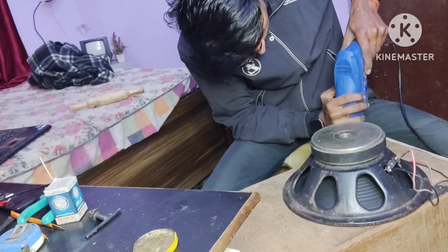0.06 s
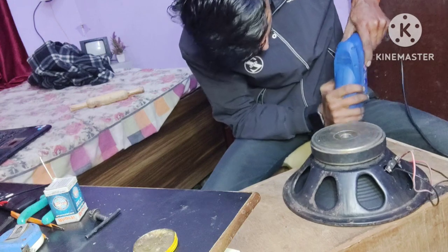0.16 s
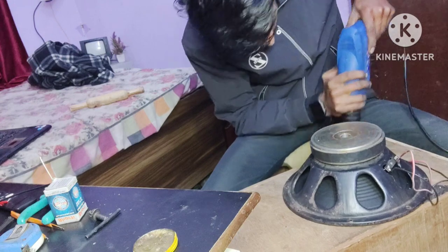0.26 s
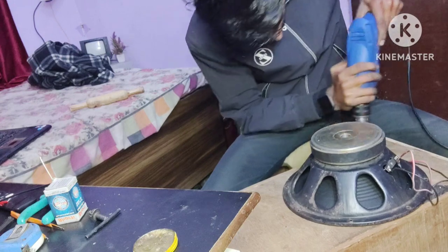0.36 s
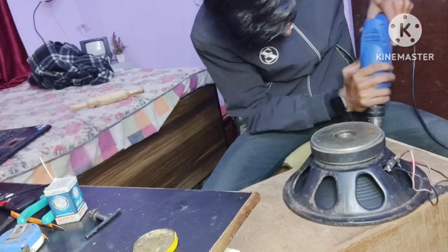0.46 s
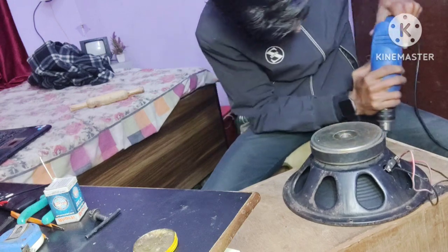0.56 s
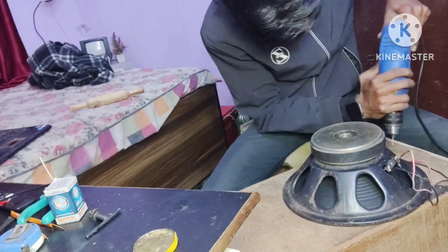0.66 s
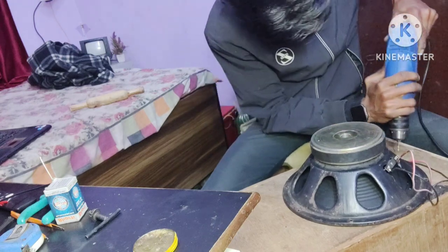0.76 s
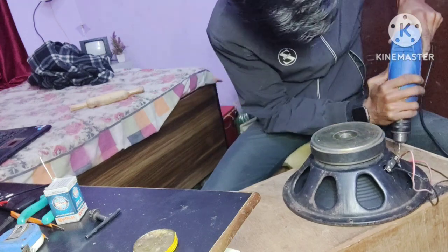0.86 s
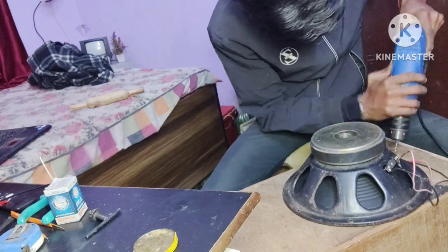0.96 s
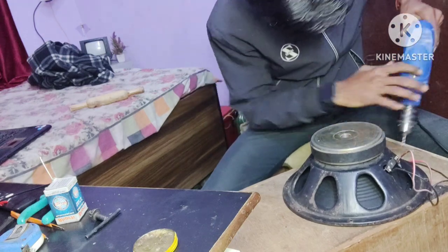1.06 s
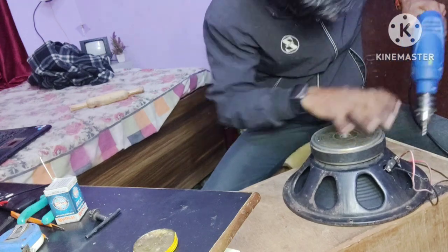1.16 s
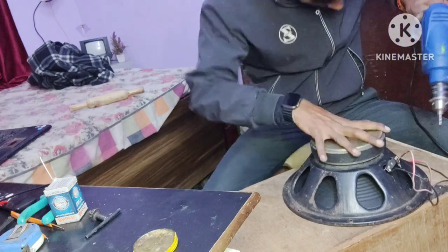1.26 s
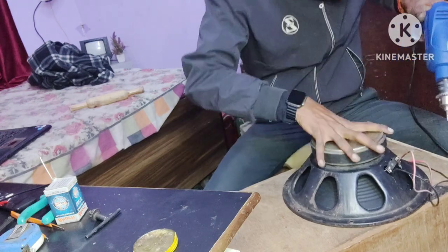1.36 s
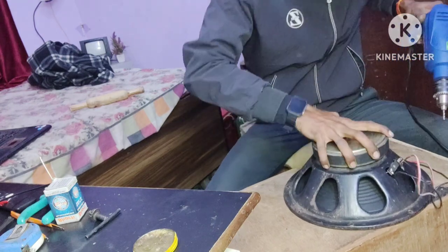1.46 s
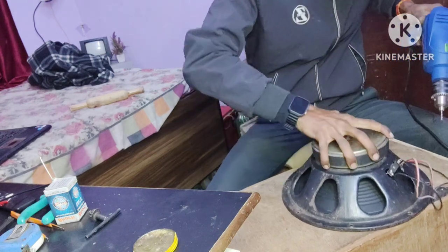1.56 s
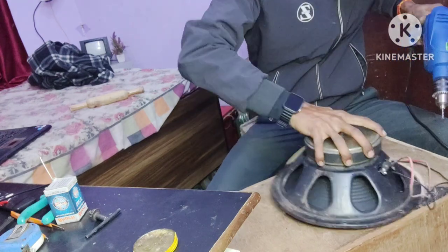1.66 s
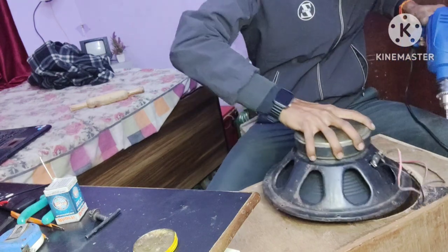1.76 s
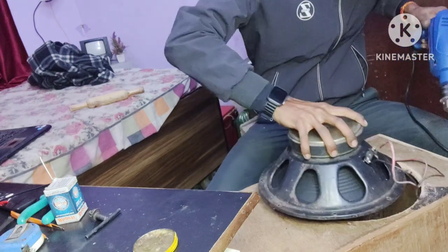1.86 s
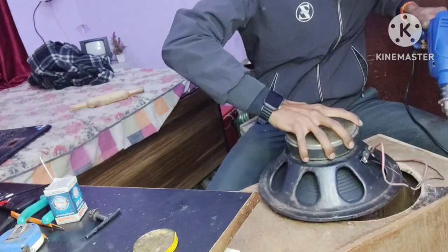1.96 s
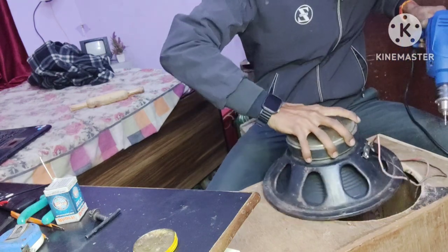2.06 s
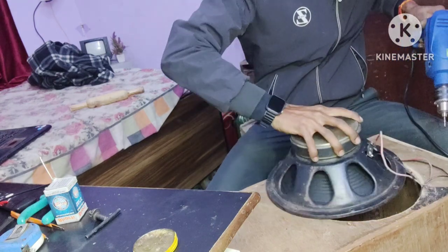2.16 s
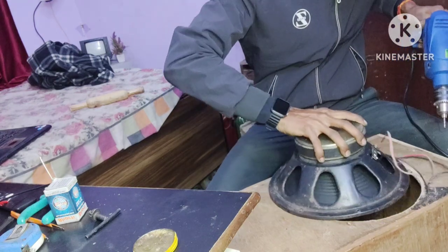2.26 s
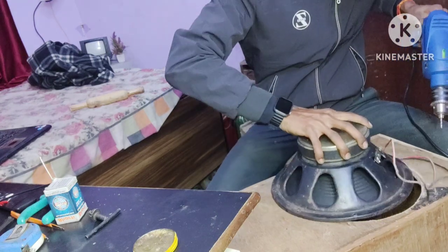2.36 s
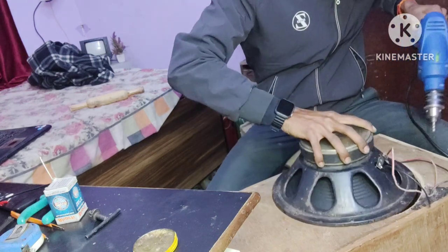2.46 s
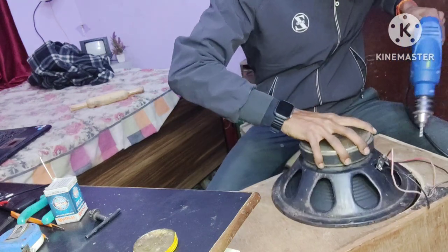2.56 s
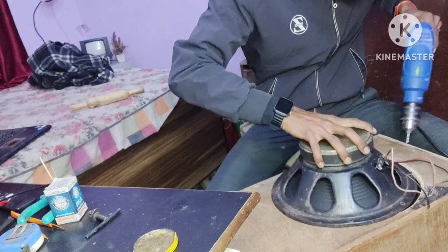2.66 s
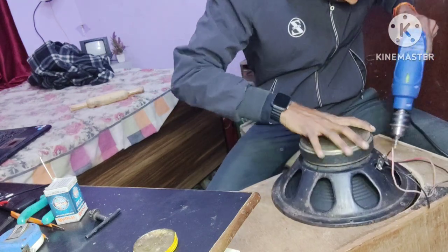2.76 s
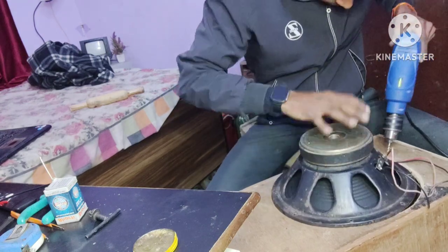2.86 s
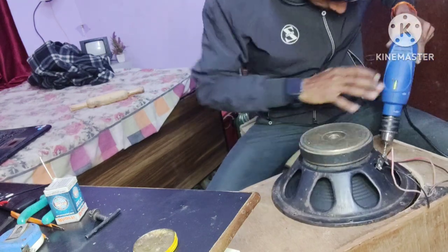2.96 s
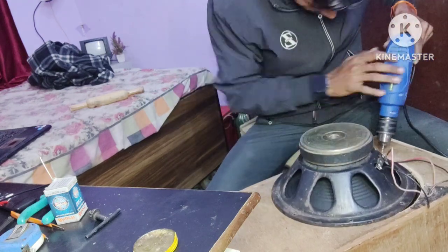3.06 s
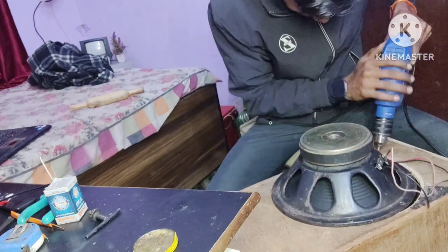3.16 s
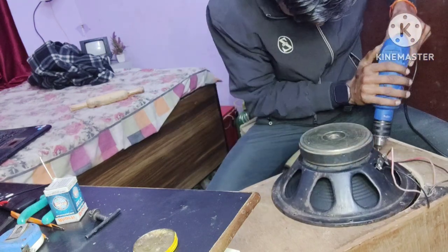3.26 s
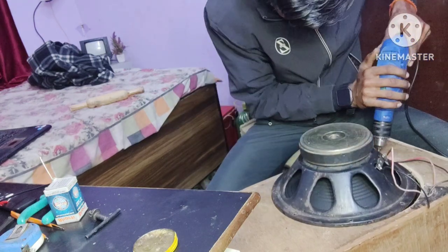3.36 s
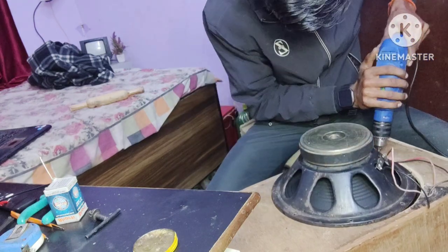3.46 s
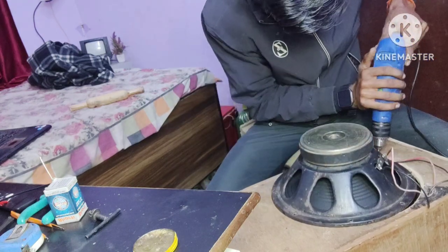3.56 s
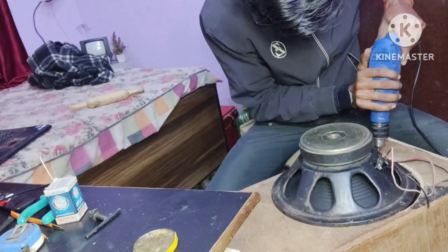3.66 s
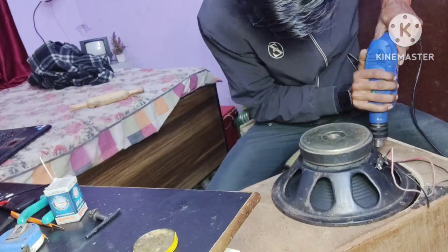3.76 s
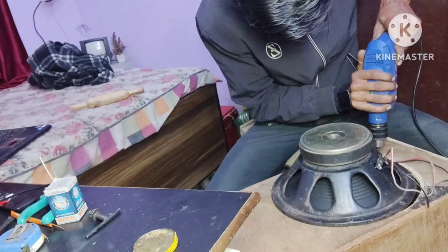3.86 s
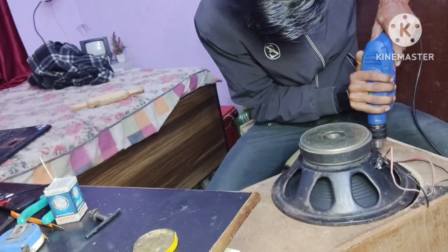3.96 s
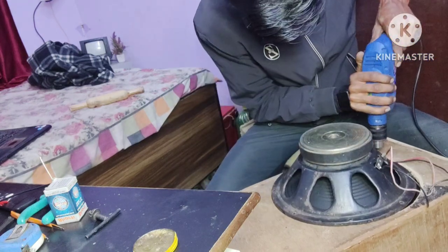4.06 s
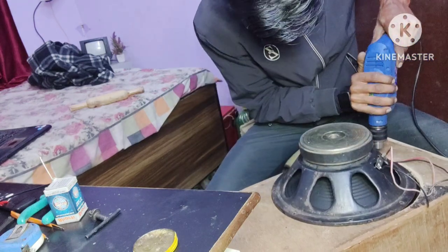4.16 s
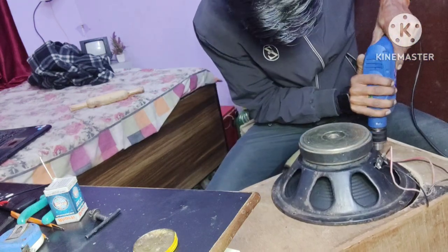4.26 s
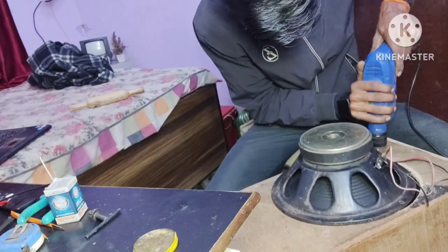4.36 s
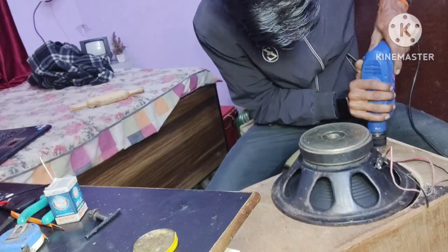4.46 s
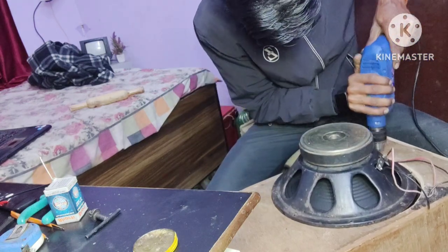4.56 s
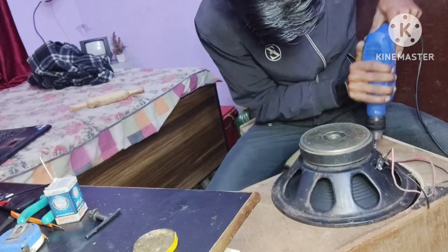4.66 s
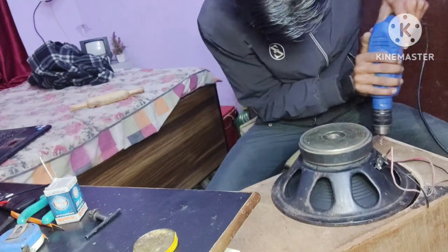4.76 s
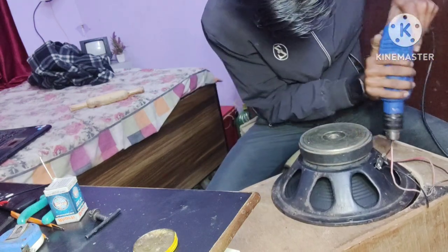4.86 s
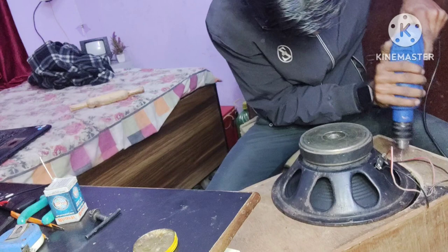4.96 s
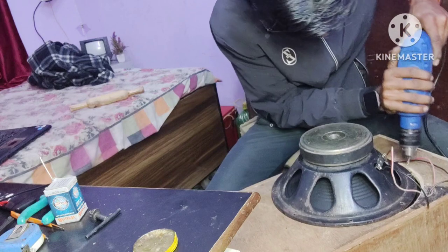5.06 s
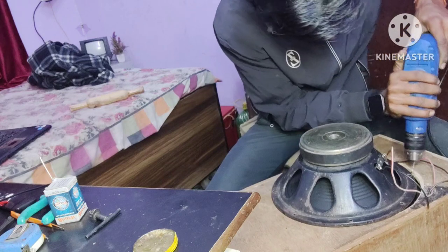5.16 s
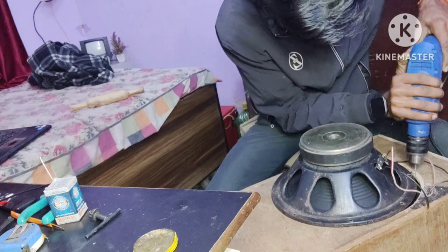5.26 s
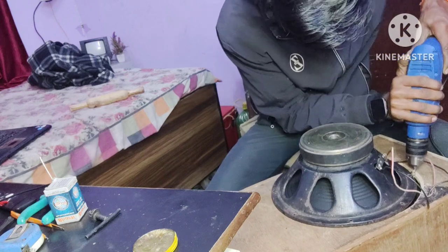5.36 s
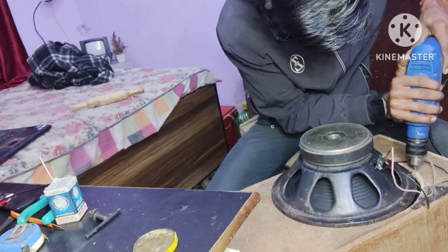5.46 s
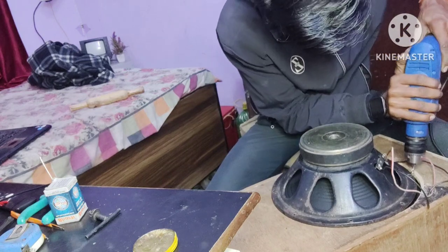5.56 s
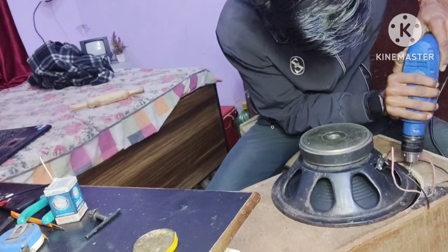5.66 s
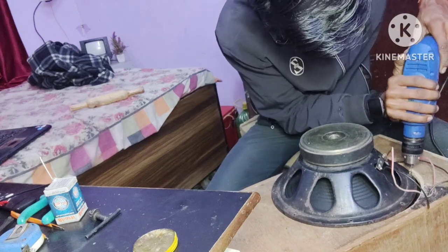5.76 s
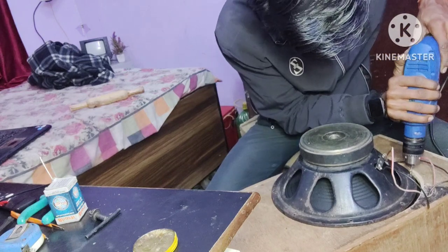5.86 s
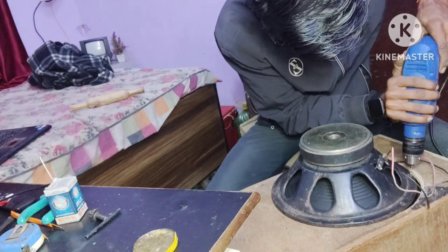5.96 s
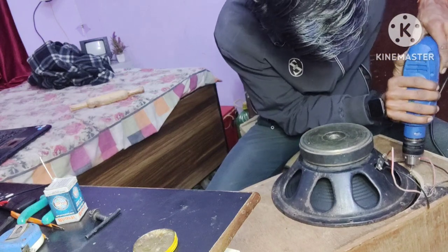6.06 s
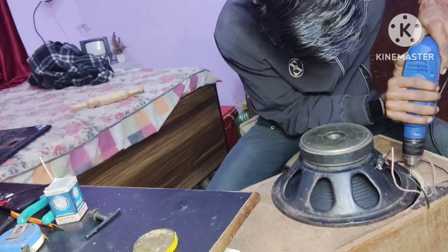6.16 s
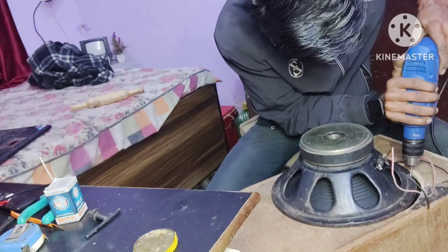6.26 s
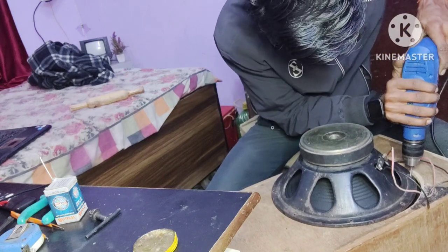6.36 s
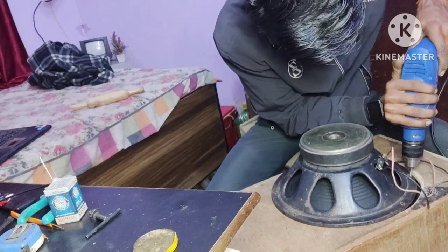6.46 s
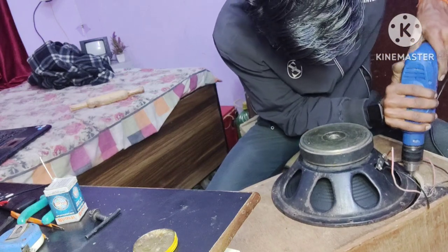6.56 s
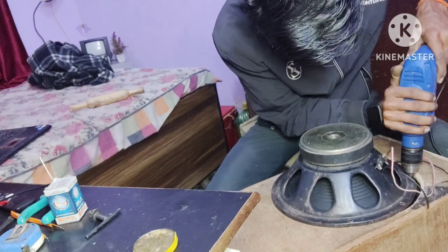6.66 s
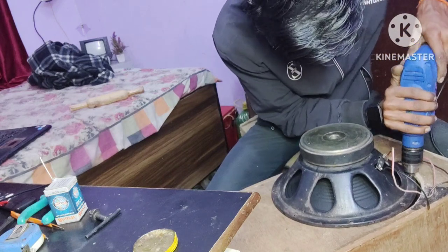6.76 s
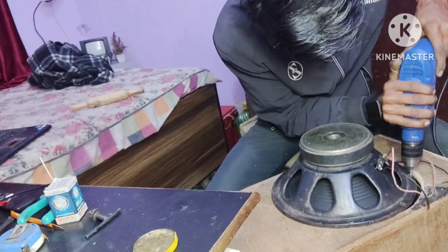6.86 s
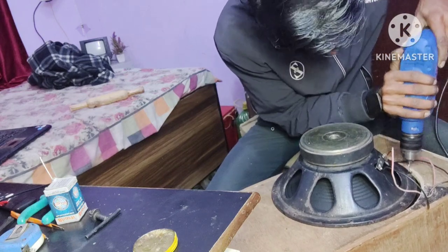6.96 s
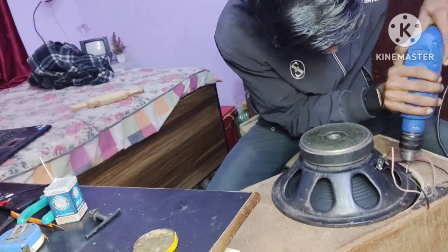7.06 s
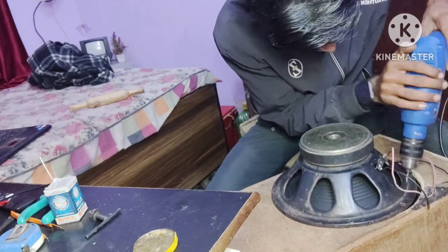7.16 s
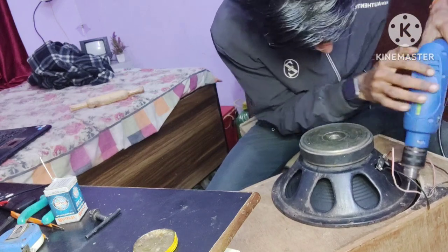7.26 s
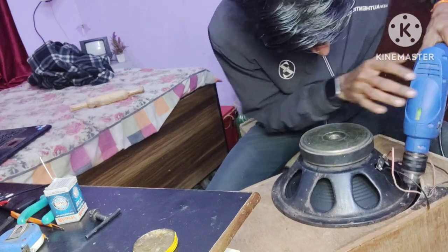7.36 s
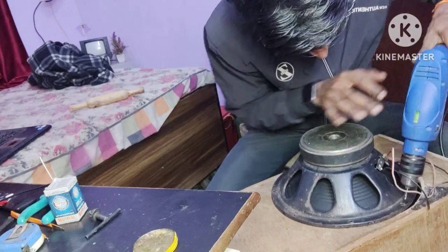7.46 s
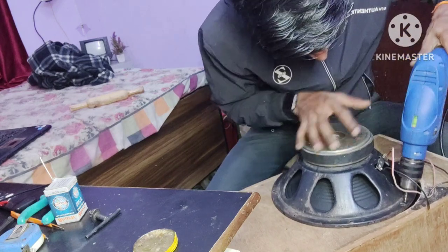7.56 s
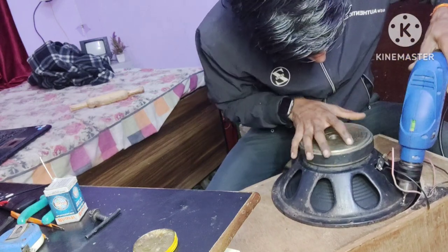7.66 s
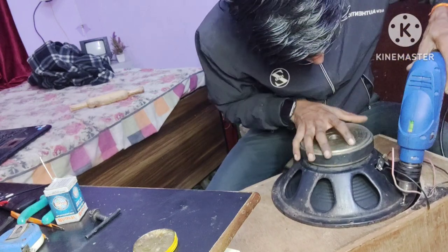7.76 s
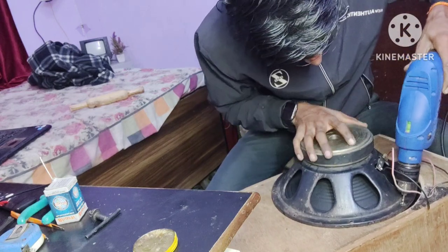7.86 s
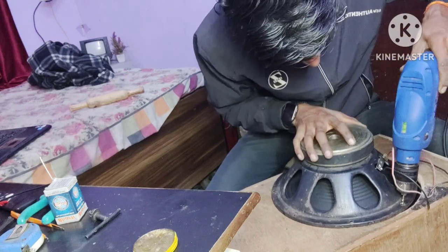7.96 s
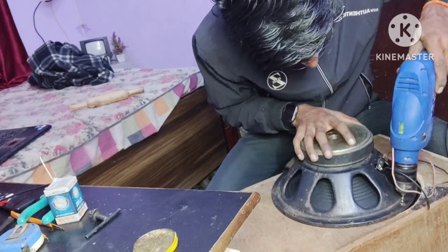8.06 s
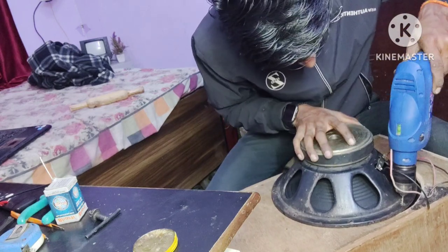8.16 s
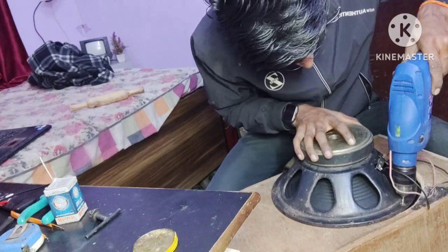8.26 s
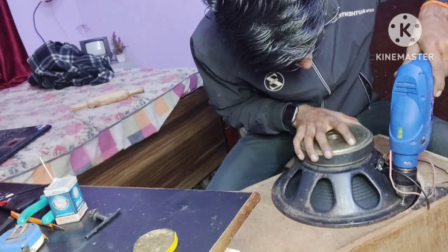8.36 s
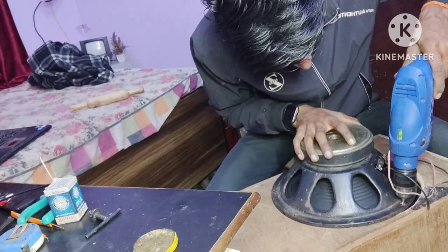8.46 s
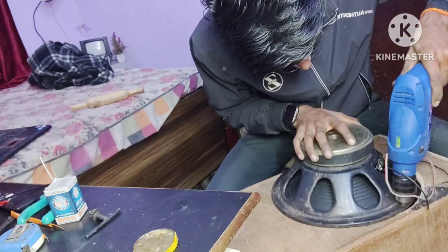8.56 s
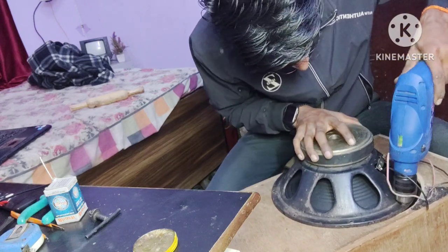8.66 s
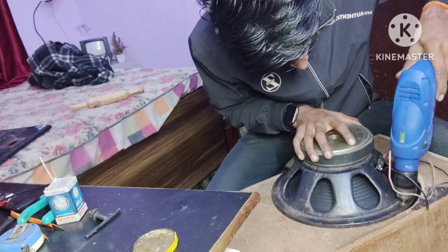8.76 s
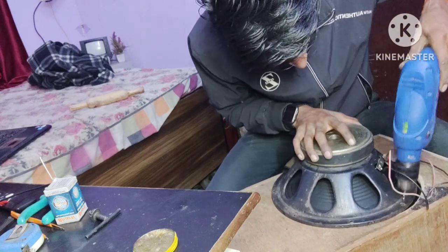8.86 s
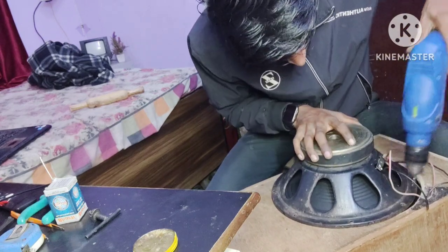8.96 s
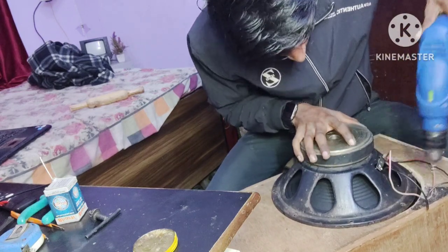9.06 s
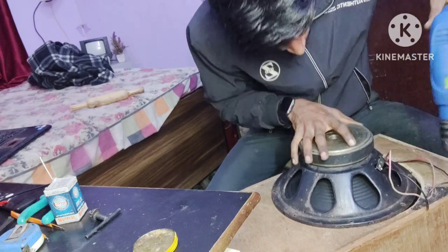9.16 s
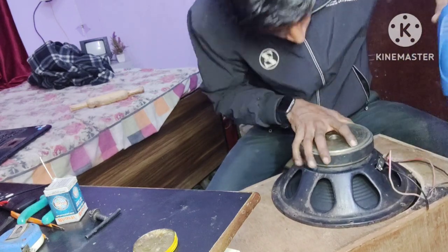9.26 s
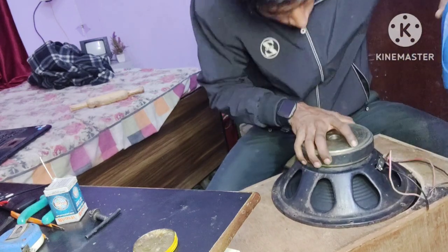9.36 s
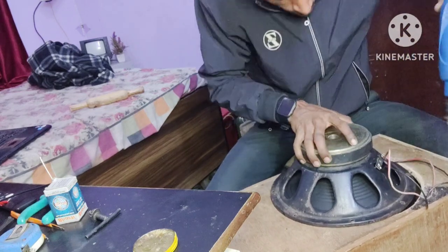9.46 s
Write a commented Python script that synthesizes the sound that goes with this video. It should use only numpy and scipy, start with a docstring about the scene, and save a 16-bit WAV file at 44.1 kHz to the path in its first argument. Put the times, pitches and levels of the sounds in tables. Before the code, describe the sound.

Close stereo sound in a small room with short wall reflections. At 0 s a handheld electric drill is already at full speed, its bit knocking and a screw rattling in a wooden cabinet; power stops almost at once and the gritty gear whine glides down for about a second, fading near 1.2 s. From 1.3 to 2.7 s the loudspeaker is shifted: soft hollow bumps, scuffs and tiny metal ticks, densest around 2.4 s. A quiet fan whine and soft air noise remain. At 4.0 s the drill spins up quickly, buzzing and hissing, the screw grinding until hard knocks and a rattle at 4.5 s, then coasts down to about 5.7 s. Faint bumps near 5.5 and 5.9 s. A third pull runs from 6.25 s, slipping at 6.75 s, dying by 7.9 s with light taps at 7.8 s. The fourth starts at 8.2 s, clatters at 8.7 s, and is still winding down at the end.

```python
"""A power drill backs screws out of a loudspeaker frame on a wooden cabinet, in a small room.
Four short trigger pulls, the first already under way and the last still coasting at the end: noise and
tones follow the rotor's turns, while screw and bit strike a bank of decaying cabinet modes.
In between, the shifted loudspeaker bumps the cabinet and metal ticks as bursts of grit.
Behind it a small fan whines in soft air noise; near walls answer, and two close microphones hear it all."""
import sys
import numpy as np
from scipy import signal
from scipy.fft import rfft, irfft, next_fast_len
from scipy.io import wavfile

SR = 44100
rng = np.random.default_rng(int(sys.argv[2]) if len(sys.argv) > 2 else 0)


def dump_mix(stems):
    """Bounce the given channels to the path in sys.argv[1] as a 16-bit WAV at rate SR."""
    frames = np.atleast_2d(stems).T  # one column per channel
    limited = np.clip(frames, -1, 1)  # hard clip at full scale
    pcm = np.round(limited * 32767).astype(np.int16)
    wavfile.write(sys.argv[1], SR, pcm)


N = 419832
TIME = np.arange(N) / SR
EDGE_HZ = 15550  # upper band limit

# The trigger pulls. Each row: pressed at in seconds, released at in seconds, free speed in turns/s,
# spin-up time in seconds, coasting time in seconds.
PULLS = [(-.532, .069, 335, .191, 1.145), (3.972, 4.591, 327.8, .158, 1.202),
         (6.254, 6.827, 322.9, .185, 1.232), (8.21, 8.79, 338.5, .175, 1.275)]
# The gears sit differently on each pull, and touch on their other flanks when coasting.
# Each row: grinding in dB, then three mesh tones under power in dB, and the same tones coasting in dB;
# the tones lie at 5, 10 and 15 times rotor speed.
MESH_DB = [(1.5, (-2, -1, -5), (-2, -5, 1.5)), (0, (-5, .5, -6), (-4, -3, -2)), (0, (-7, 0, -7),
           (-5, 0, -1)), (.5, (2.5, -3, -7), (2, -2, -5))]
# Weak gear overtones. Each row: multiple of rotor speed, level in dB.
GEAR_ORDERS = [(20, -6.5), (25, -8), (30, -7), (34, -9), (40, -9)]
# Commutator bars. Each row: multiple of rotor speed, level in dB.
BAR_ORDERS = [(24, -9.5), (48, -8.5), (72, -12.5), (96, -16)]
# Noise spectra of gears, brushes and cooling fan. Each row: frequency in Hz, level in dB.
GEARBOX = [(150, -22), (500, -12), (850, -6), (1080, -7), (1300, -1), (1550, 1), (1800, -2), (2150, 1),
           (2480, -5.5), (2850, 1.5), (3250, -1.5), (3700, -2.5), (4300, -7), (5200, -17), (9000, -35)]
BRUSHES = [(1500, -15.5), (3500, -1.5), (4500, 1.5), (5500, -1.5), (7500, -3), (8800, 1), (9700, -15.5),
           (11500, -3.5), (15500, -6)]
COOLING_AIR = [(30, -33), (100, -2.5), (300, -13.5), (700, 5.5), (1300, -2.5), (3000, -8.5), (8000, -6),
               (15000, -54)]
# The gear case picks out mesh tones gliding through its resonances. Each row: frequency in Hz, level in dB.
GEAR_CASE = [(400, -24), (700, -13), (1120, -17), (1280, -4), (1420, 0), (1600, -4.5), (1800, -8),
             (1990, 1), (2170, 2), (2430, -14), (2750, 2.5), (2980, 2), (3200, -3.5), (3700, -1),
             (4200, -1.5), (4700, -7), (5400, -14), (9000, -35)]
# The vents pass the commutator whistle best in the upper middle. Each row: frequency in Hz, level in dB.
VENTS = [(700, -14), (1150, -9), (1450, 2), (1750, 1), (2100, 6.5), (2430, -3), (2800, 2.5), (3300, 0),
         (3850, 4.5), (4600, -4), (5500, 1), (6600, 2), (7600, -2), (8500, -2), (10000, -11), (11600, 2),
         (13000, -7), (15000, -12)]
# Noise grows with speed as gentle rubbing plus a steep rush. Columns: rubbing at working speed in
# relative dB, its power of speed, rush at working speed in relative dB, its power of speed.
GRIND_LAW = (-28, 1.14, -25, 2.5)
HISS_LAW = (-34, 0.59, -26, 4)
FULL_SPEED = 320  # working speed (turns/s)
DRIVEN_DB = 1.5  # the gears grind harder while the motor pushes them
STRAIN_DB = 2.5  # from standstill the motor draws a heavy current and is louder for its speed
PULSE_HZ = 100


def drill(pull, grind_db, powered_db, coasting_db, air_db=-30, grain_db=3, throb=0.17, buzz=0.41):
    """Gear teeth and commutator bars scrape and sing; the fan roars. Gives (s, scraping, singing)."""
    t, speed = rotor(*pull)
    n = len(t)
    driven = t < pull[1]
    pace = speed / FULL_SPEED
    turns = np.cumsum(speed * (1 + .005 * wander(n, 250))) / SR

    push_db = driven * (DRIVEN_DB + STRAIN_DB * (1 - pace))
    gears = loudness(pace, *GRIND_LAW) * amp(grind_db + push_db - 1)
    # under power the brush hiss pulses a hundred times a second
    pulsing = 1 + buzz * driven * np.cos(2 * np.pi * PULSE_HZ * t)
    brushes = loudness(pace, *HISS_LAW) * pulsing

    # play in the bearings bunches the scraping into each turn
    bunching = (1 + throb * np.cos(2 * np.pi * turns)) * amp(1.5 * wander(n, 69.63))
    # chance rubbing, plus a worn part that gains power with speed
    rubbing = np.sqrt(.7) * rng.standard_normal(n) + np.sqrt(.15 * pace) * worn(turns)
    meshing = 1 + .5 * np.cos(2 * np.pi * 5 * turns)
    teeth = rubbing * amp(grain_db * wander(n, 1500)) * bunching * meshing
    bars = rng.standard_normal(n) * amp(2.0 * wander(n, 2500)) * bunching
    air = unit(colour(rng.standard_normal(n), COOLING_AIR)) * amp(air_db) * pace ** 1.61
    scraping = gears * unit(colour(teeth, GEARBOX)) + brushes * unit(colour(bars, BRUSHES)) + air

    mesh_orders = [(order, np.where(driven, on, off))
                   for order, on, off in zip((5, 10, 15), powered_db, coasting_db)]
    mesh = .62 * colour(tones([*mesh_orders, *GEAR_ORDERS], turns, speed), GEAR_CASE)
    commutator = 1.25 * colour(tones(BAR_ORDERS, turns, speed), VENTS)
    # the tones stand out more at low speed, where the rush is weak
    slow_lift = amp(np.where(driven, 2, 4.5) * (1 - pace))
    singing = (gears * mesh + brushes * commutator) * slow_lift
    return t[0], scraping, singing


FRICTION_SPEED = 190  # speed at which drag equals the dry friction of the brushes (turns/s)


def rotor(pressed, released, free_speed, spin_up, coast):
    """Power drives the rotor toward free speed; drag and friction stop it. Gives (clock s, turns/s)."""
    top = free_speed * (1 - np.exp((pressed - released) / spin_up))
    stopped = released + coast * np.log(1 + top / FRICTION_SPEED)
    t = np.arange(pressed, stopped, 1 / SR)
    rising = free_speed * (1 - np.exp((pressed - t) / spin_up))
    coasting = (top + FRICTION_SPEED) * np.exp((released - t) / coast) - FRICTION_SPEED
    return t, np.maximum(np.where(t < released, rising, coasting), 0)


CRAWL_SPEED = 20  # below this the rotor is almost silent (turns/s)


def loudness(pace, rub_db, rub_power, rush_db, rush_power):
    """Rubbing rules at low speed, the rush near full speed."""
    turning = np.tanh(pace * FULL_SPEED / CRAWL_SPEED)
    return turning * np.hypot(amp(rub_db) * pace ** rub_power, amp(rush_db) * pace ** rush_power)


def worn(turns, count=44, size=2048):
    """Uneven teeth scrape alike on every turn: weak partials glide with the rotor, in slowly varying mix."""
    phases = np.exp(2j * np.pi * rng.random((3, count)))
    marks = irfft(np.c_[np.zeros((3, 1)), phases], size)
    place = turns % 1 * size
    return unit(sum(wander(len(turns), 15) * np.interp(place, np.arange(size), row) for row in marks))


def tones(orders, turns, speed):
    """Partials locked to the rotor; each swells, fades and flutters on its own."""
    n = len(turns)
    total = np.zeros(n)
    for order, db in orders:
        level = amp(db - 1.3 + 1.8 * wander(n, 30) + 3.2 * wander(n, 160))
        wave = np.cos(2 * np.pi * (order * turns + rng.random()))
        total += level * wave * (order * speed < EDGE_HZ)
    return total


# The screw rattles free once on each pull. Each row: start in seconds, length in seconds, relative
# level in dB, hardness in Hz, fade over the length in dB, rumble of the thread before in relative dB,
# loose screw after in relative dB.
SLIPS = [(0, 0.12, -16.5, 1400, 4.5, -32, -31.5), (4.489, 0.073, -15.5, 900, 1.5, -30.5, -29.5),
         (6.747, .06, -20, 1530, 9, -30.5, -25.5), (8.686, 0.12, -16.5, 500, 2, -36, -30.5)]
LOOSE_S, LOOSE_HZ, LOOSE_FADE_DB = 0.31, 288, 24  # the freed screw chatters and settles


def screw(pressed, s, length, db, hard_hz, fade_db, thread_db, loose_db):
    """The thread rumbles in the board, the screw rattles free, then chatters and settles."""
    return [thread(pressed, s, thread_db),
            rattle(s, length, db, hard_hz, fade_db),
            rattle(s + length, LOOSE_S, loose_db, LOOSE_HZ, LOOSE_FADE_DB)]


# The board around the turning screw. Each row: frequency in Hz, level in dB.
THREAD_COLOUR = [(30, -7), (90, -8.5), (150, 1), (230, -6), (300, -1.5), (480, -10.5), (1500, -34.5)]
THREAD_SWELL_DB = 13.5  # the bite grows steadily by this much until the screw slips
THREAD_RISE_S = 0.13  # the thread starts to turn gently


def thread(start, end, db, lumpy_db=3):
    """The thread grinds through the board in uneven bites, ever harder."""
    n = round((end - start) * SR)
    swell = amp(THREAD_SWELL_DB * np.linspace(-1, 0, n) + lumpy_db * wander(n, 40.5))
    swell *= np.minimum(np.arange(n) / SR / THREAD_RISE_S, 1)
    return start, amp(db) * unit(colour(rng.standard_normal(n) * swell, THREAD_COLOUR))


# The cabinet driven through the screw, also by knocks. Each row: frequency in Hz, level in dB.
RATTLE_COLOUR = [(30, -14), (55, -6), (100, 0.5), (160, 0.5), (260, 2), (450, 1), (900, 4), (1600, 2.5),
                 (2150, 7.5), (2800, 10.5), (4000, 11.5)]


def rattle(s, length, db, hard_hz, fade_db, per_s=190, spread_db=6, rub=0.037):
    """The screw shakes in its hole and the thread rasps: small uneven blows on the cabinet."""
    n = round(length * SR)
    at = np.cumsum(np.r_[0, rng.uniform(.35, 1.65, 200)]) * SR / per_s
    size = amp(spread_db * rng.uniform(-0.55, 1, len(at))) * rng.choice([-1, 1], len(at))
    size[0] = amp(spread_db)  # the first slip is a full one
    force = rub * rng.standard_normal(n)
    force[at[at < n].astype(int)] += size[at < n]
    fading = force * amp(-fade_db * np.arange(n) / n)
    sound = signal.fftconvolve(soften(fading, hard_hz), cabinet_ring())
    sound = colour(sound, RATTLE_COLOUR)
    return s, amp(db) * sound / np.sqrt(np.sum(sound ** 2) / n)


# The bit jumps out of the screw head and strikes it again.
# Each row: start in seconds, relative level in dB, centre of the knock in Hz.
KNOCKS = [(.013, -17.5, 650), (.033, -14.5, 550), (.074, -17.5, 450), (4.489, -14.5, 1000),
          (4.504, -9.5, 804), (4.533, -11.5, 553), (4.556, -19, 328), (6.749, -15, 950),
          (6.759, -14.5, 700), (6.785, -15, 380), (6.803, -22, 300), (6.822, -24, 300), (6.865, -23, 500),
          (6.903, -20.5, 300), (8.686, -21, 600), (8.707, -13.5, 300), (8.727, -14, 430),
          (8.744, -16.5, 270), (8.777, -9, 400), (8.803, -13, 230)]
KNOCK_SCUFF_S, KNOCK_DAMP_S = 0.0037, 0.02  # the pressed bit skids briefly and damps the board


def knock(s, db, centre_hz, skid=.12, width=1.75):
    """One hard blow of the bit, passed through the screw into the board."""
    t = np.arange(SR // 20) / SR
    force = skid * rng.standard_normal(len(t)) * np.exp(-t / KNOCK_SCUFF_S)
    force[0] += 1
    ring = cabinet_ring()
    ring = ring * np.exp(-np.arange(len(ring)) / SR / KNOCK_DAMP_S)
    contact = signal.butter(1, [centre_hz / width, centre_hz * width], "band", fs=SR)
    struck = signal.lfilter(*contact, signal.fftconvolve(force, ring))
    sound = colour(struck, RATTLE_COLOUR)
    return s, amp(db) * sound / np.sqrt(np.sum(sound ** 2) / (SR / 100))


# The cabinet with its steel frame. Each row: frequency in Hz, level in dB, 60 dB decay time in seconds.
CABINET = [(57, -6, 0.16), (92, -7, 0.12), (110.5, -1.5, 0.21), (150, -4.5, 0.17), (206, -7, 0.15),
           (239.3, -3.5, 0.12), (263.2, -2, 0.16), (306.4, -4.5, 0.12), (379.7, 0.5, 0.1),
           (501.6, 3, 0.076), (636, 2, 0.068), (811.5, 3.5, 0.072), (948, 0, 0.051), (1168, -4, 0.078),
           (1647, -1.5, 0.042), (2000, 5.5, 0.021), (2280, 1.5, 0.023)]
# Dense board modes. Each row: frequency in Hz, level in dB.
PANELS = [(30, -26), (70, -1), (120, 2), (250, 6.5), (450, 2), (850, -2.5), (1500, -2.5), (2500, 0.5),
          (4000, -1), (9000, -22)]


def cabinet_ring(panel_db=-3, panel_t60=0.12):
    """The cabinet's answer to one blow: a few strong modes over many weak ones."""
    t = np.arange(SR // 3) / SR
    modes = np.zeros(len(t))
    for k, (hz, db, t60) in enumerate(CABINET):
        modes += (-1) ** k * amp(db - 60 * t / t60) * np.sin(2 * np.pi * hz * t)
    panels = colour(rng.standard_normal(len(t)), PANELS) * amp(-60 * t / panel_t60)
    return unit(modes) + amp(panel_db) * unit(panels)


# The loudspeaker, bit and hands bump the cabinet.
# Each row: start in seconds, relative level in dB, hardness in Hz, scuffing time in seconds.
BUMPS = [(0.131, -24, 110, 0.014), (1.351, -37, 190, 0.016), (1.509, -42.5, 70, 0.058),
         (1.67, -39.5, 200, 0.037), (2.275, -37.5, 600, 0.049), (2.388, -30.5, 644, 0.012),
         (2.405, -28, 150, 0.0089), (2.433, -23.5, 394, 0.019), (2.467, -27.5, 170, 0.02),
         (2.579, -32, 200, 0.068), (2.666, -38, 151, 0.016), (3.45, -44, 250, 0.019),
         (4.582, -28, 110, .025), (5.519, -38, 120, .041), (5.918, -31.5, 130, 0.057),
         (7.793, -30, 2000, 0.021), (7.812, -36, 447, 0.012), (7.833, -39, 300, .01)]
# Struck from above, the top board booms. Each row: frequency in Hz, level in dB.
BUMP_COLOUR = [(25, -4), (58, 9.5), (85, 6), (120, 0.5), (210, 6.5), (300, -0.5), (420, -4), (700, -3),
               (1400, 0), (2200, 8.5), (4000, -2)]


def bump(s, db, hard_hz, scuff):
    """A padded blow, then a short scuff as the rim settles."""
    t = np.arange(SR // 4) / SR
    force = 0.07 * rng.standard_normal(len(t)) * np.exp(-t / scuff)
    force[0] += 1
    padded = soften(soften(force, hard_hz), 7 * hard_hz)
    sound = colour(signal.fftconvolve(padded, cabinet_ring()), BUMP_COLOUR)
    return s, amp(db) * sound / np.sqrt(np.sum(sound ** 2) / (0.045 * SR))


# Small ticks of bit, screw and trigger.
# Each row: start in seconds, relative level in dB, scraping time in seconds.
TICKS = [(1.626, -43, .0088), (1.689, -51, .05), (2.288, -44, 0.021), (2.387, -42, 0.014),
         (2.419, -41, 0.0052), (2.435, -42, 0.022), (2.58, -47.5, 0.1), (3.19, -53.5, .21),
         (3.809, -42, 0.0096), (6.112, -42, .009), (6.212, -50, .02), (7.793, -35, .04),
         (8.1268, -41.5, 0.05)]
# Ring of the small metal parts. Each row: frequency in Hz, level in dB.
TICK_COLOUR = [(500, -12), (1500, 14), (2800, 11.5), (4500, 2), (8000, -2.5), (10000, -14), (13000, -2),
               (15500, -34)]


def tick(s, db, scrape):
    """Metal touches metal: a dying burst of rough grit."""
    t = np.arange(SR // 3) / SR
    rough = rng.standard_normal(len(t)) * amp(4.6 * wander(len(t), 900))
    grit = unit(colour(rough, TICK_COLOUR))
    return s, amp(db) * grit * np.exp(-t / scrape)


# Steady fan tones and a thin, beating electronic whistle. Each row: frequency in Hz, level in dB.
WHINE = [(506, -57.5), (630, -58), (716, -39), (2869, -65.5), (3187, -61), (15052, -76), (15151, -80),
         (15251, -63.5)]
# Spectrum of room and fan noise. Each row: frequency in Hz, level in dB.
FLOOR = [(20, -0.5), (150, -6.5), (300, -6.5), (480, -7), (620, 2.5), (720, 4.5), (850, 3), (1300, -10),
         (2200, -17), (2900, -15.5), (4500, -32.5), (9500, -39), (12000, -43.5), (15500, -32)]
FLOOR_DB = -42.5


def fan():
    """A wavering whine in soft air noise."""
    arrival = TIME - np.array([[.0002], [0]])  # the left microphone hears the whine later (s)
    whine = np.zeros((2, N))
    for hz, db in WHINE:
        level = amp(db + wander(N, 25))
        whine += level * np.sin(2 * np.pi * hz * arrival + 0.19 * wander(N, 30))
    air = unit(colour(pair(rng.standard_normal((2, N))), FLOOR))
    return whine + amp(FLOOR_DB) * air


def room(x, wet_db=0, t60=.3):
    """Direct sound plus dense reflections from near walls, scaled to unit response energy on the left."""
    t = np.arange(SR // 2) / SR
    out = np.zeros((2, N))
    for k in range(3):
        tail = pair(rng.standard_normal((2, len(t)))) * amp(-60 * t / t60) * (t > .002)
        response = amp(wet_db) * tail / np.linalg.norm(tail[0])
        # the sound reaches the right microphone first, the left five samples later
        response[0, 5] += 1
        response[1, 0] += 1
        response /= np.linalg.norm(response[0])
        # arms and tool move, so three patterns of reflections take turns
        turn = (TIME / .8 + k) % 3
        share = np.sin(np.pi * turn / 2) ** 2 * (turn < 2)
        out += signal.oaconvolve((x * share ** .7)[None], response, axes=1)[:, :N]
    return out


# Likeness of the two microphones in a diffuse field. Each row: frequency in Hz, likeness from 0 to 1.
LIKENESS = [(60, 0.57), (130, 1), (260, 0.45), (600, 0.55), (1100, 0), (15000, 0.68)]


def pair(x):
    """Two unrelated signals become a diffuse field at two close microphones, as alike as LIKENESS says."""
    n = x.shape[1]
    like = np.clip(read(LIKENESS, np.fft.rfftfreq(n, 1 / SR)), -1, 1)
    mid, side = rfft(x) * np.sqrt([(1 + like) / 2, (1 - like) / 2])
    return irfft([mid + side, mid - side], n)


def amp(db):
    """Turns dB into an amplitude factor."""
    return 10 ** (np.asarray(db) / 20)


def unit(x):
    """Scales to rms 1."""
    return x / np.sqrt(np.mean(x ** 2) + 1e-20)


def read(points, hz):
    """Reads a table on a log-frequency axis."""
    f, value = np.transpose(points)
    return np.interp(np.log(hz + 1), np.log(f + 1), value)


def colour(x, points):
    """Filters by a spectrum in dB."""
    n = x.shape[-1]
    size = next_fast_len(n + 2000)
    gain = amp(read(points, np.fft.rfftfreq(size, 1 / SR)))
    return irfft(rfft(x, size) * gain, size)[..., :n]


def wander(n, hz):
    """Random drift of rms 1, with hz new values a second joined by straight lines."""
    knots = np.arange(n) * hz / SR
    count = int(knots[-1]) + 2
    return unit(np.interp(knots, np.arange(count), rng.standard_normal(count)))


def soften(x, hz):
    """A soft contact passes little above hz."""
    return signal.lfilter(*signal.butter(1, min(hz, SR / 3), fs=SR), x)


def add(mix, s, sound):
    """Mixes a sound in at s; it may already be under way at time zero."""
    at = round(s * SR)
    sound = sound[max(-at, 0):]
    part = mix[max(at, 0):][:len(sound)]
    part += sound[:len(part)]


def scene():
    """Drill, cabinet and small metal parts sound into the room, over the fan."""
    scrape, song, wood, blows, metal = np.zeros((5, N))
    for pull, seat_db, slip in zip(PULLS, MESH_DB, SLIPS):
        s, scraping, singing = drill(pull, *seat_db)
        add(scrape, s, scraping)
        add(song, s, singing)
        for stage in screw(s, *slip):
            add(wood, *stage)
    for row in KNOCKS:
        add(blows, *knock(*row))
    for row in BUMPS:
        add(wood, *bump(*row))
    for row in TICKS:
        add(metal, *tick(*row))
    # the gear case faces the microphones, so its tones come more directly than the noise from the vents
    motor = room(scrape, wet_db=5.5, t60=0.25) + room(song, wet_db=-1, t60=.22)
    knocks = room(blows, wet_db=-2, t60=.22)
    cabinet = room(wood, wet_db=2.5, t60=0.3)
    clicks = room(metal, wet_db=1.5, t60=.33)
    return amp(2.5) * motor + knocks + cabinet + clicks + fan()


# Balance of the microphone pair. Each row: frequency in Hz, left minus right in dB.
BALANCE_DB = [(100, -1), (300, 2.5), (700, -1.5), (1500, 0.5), (3200, -1.5), (4500, 1.5), (6000, 10.5),
              (8300, 27), (10500, 6.5), (15000, 13)]


def record(dry):
    """The right microphone is duller than the left; peaks clip at .95; then the band limit."""
    hz = np.fft.rfftfreq(N, 1 / SR)
    lean = amp(read(BALANCE_DB, hz))
    microphones = np.array([lean, np.ones_like(lean)]) / np.sqrt((1 + lean ** 2) / 2)
    heard = np.clip(irfft(rfft(dry) * microphones, N), -.95, .95)
    band_limit = signal.firwin(801, EDGE_HZ, window=("kaiser", 9), fs=SR)
    return signal.oaconvolve(heard, band_limit[None], "same")


dry = scene()
out = record(dry)
dump_mix(out)
```